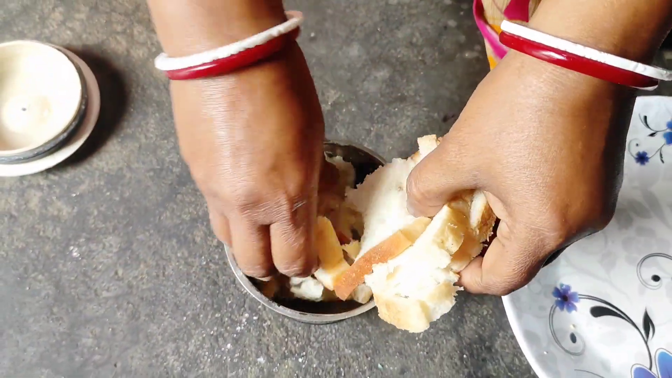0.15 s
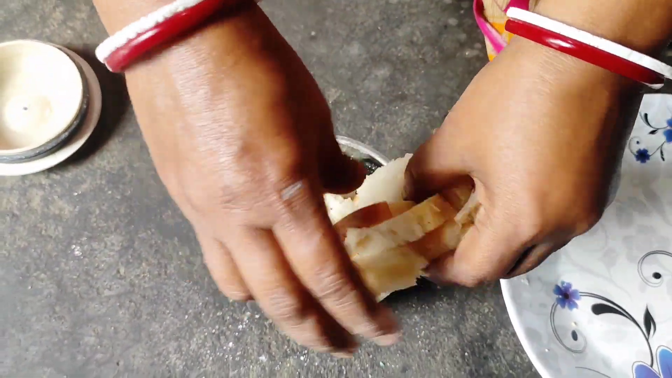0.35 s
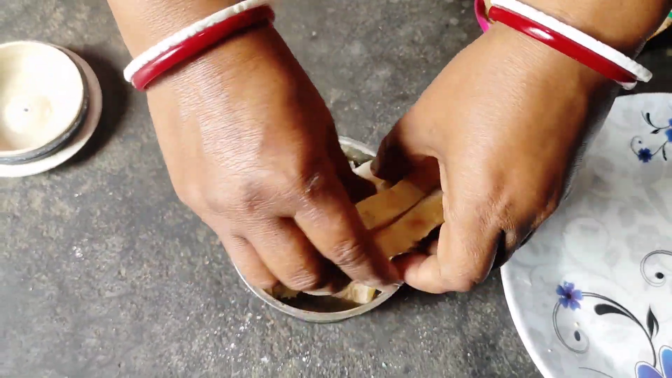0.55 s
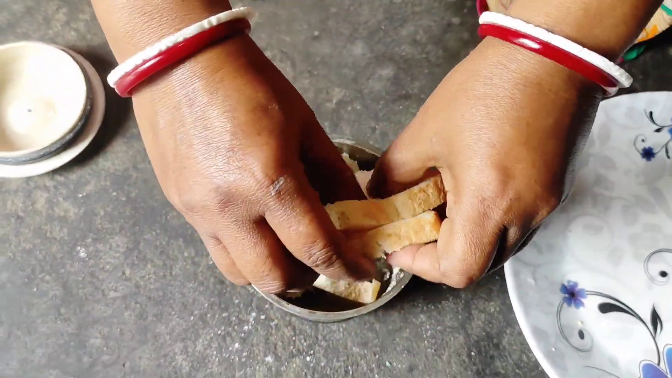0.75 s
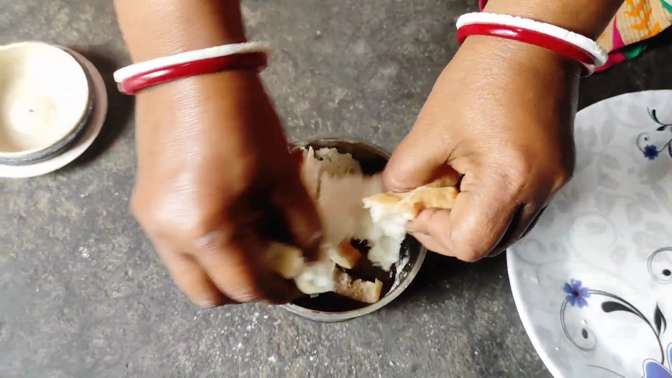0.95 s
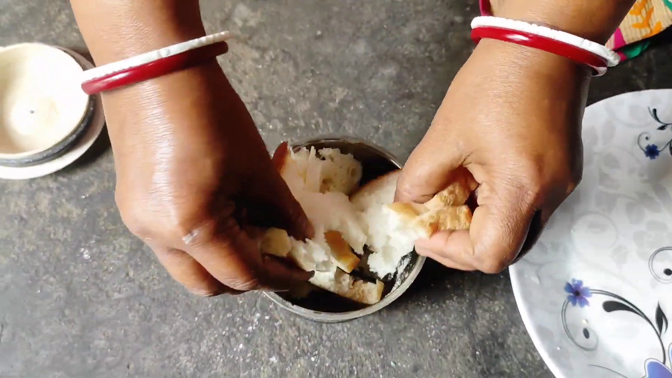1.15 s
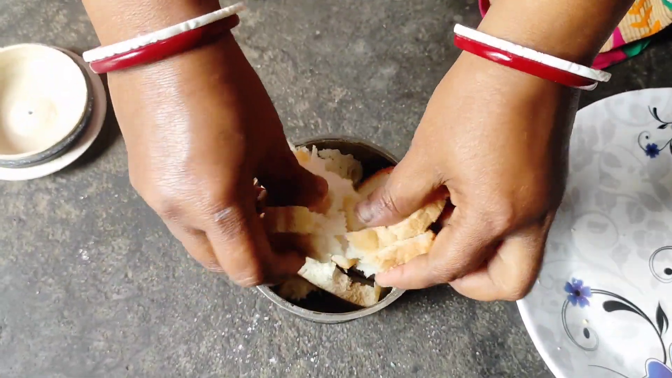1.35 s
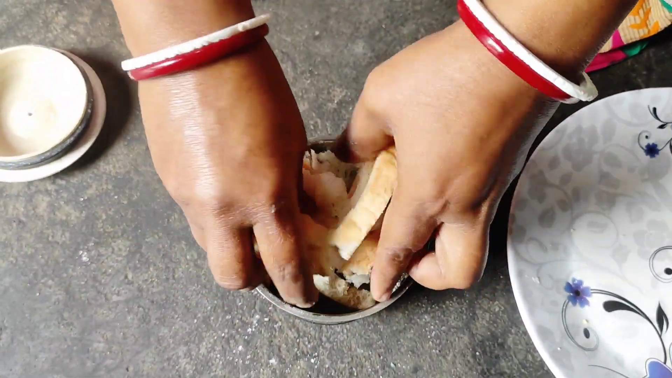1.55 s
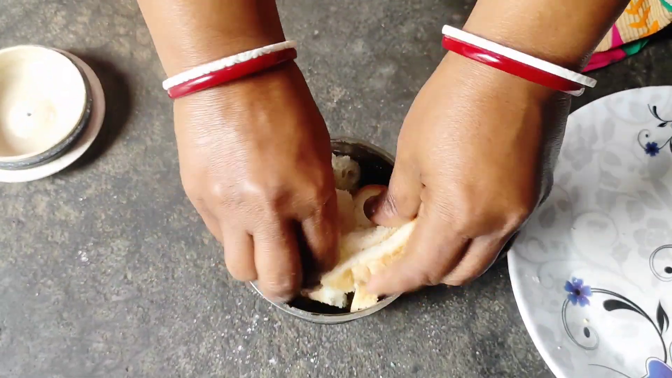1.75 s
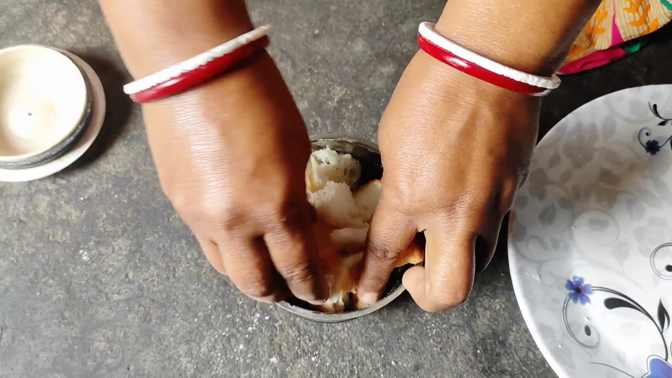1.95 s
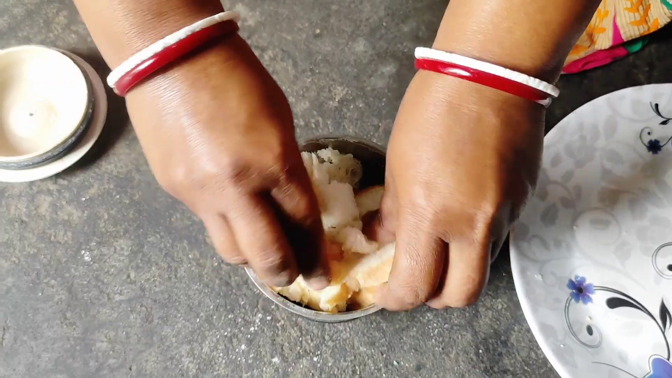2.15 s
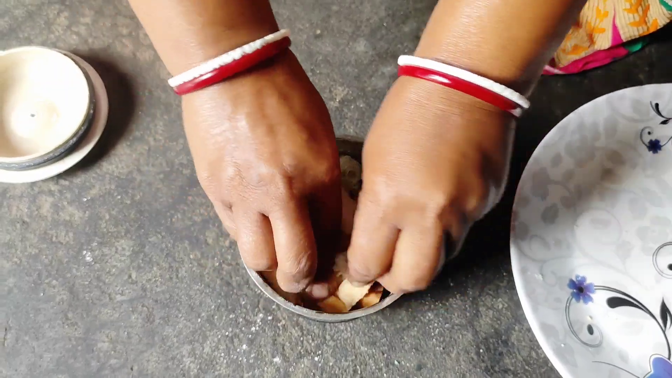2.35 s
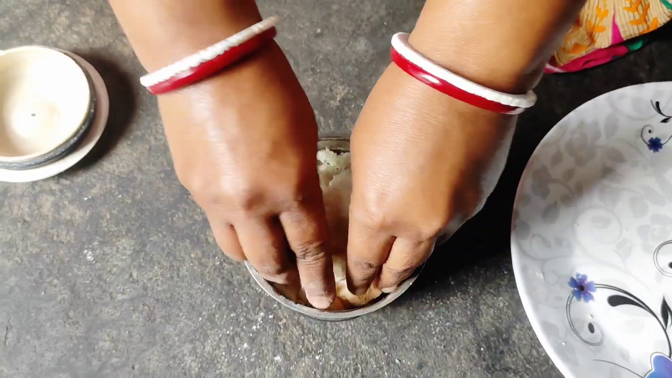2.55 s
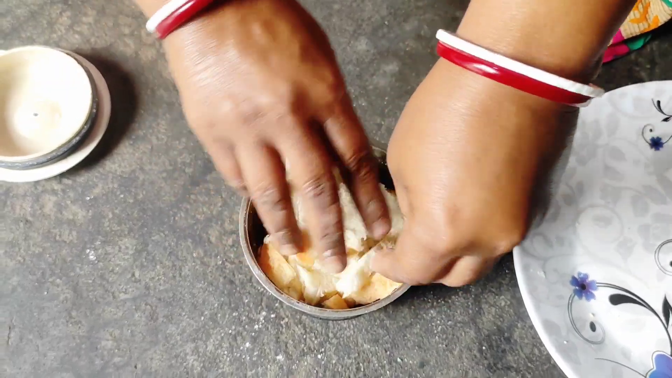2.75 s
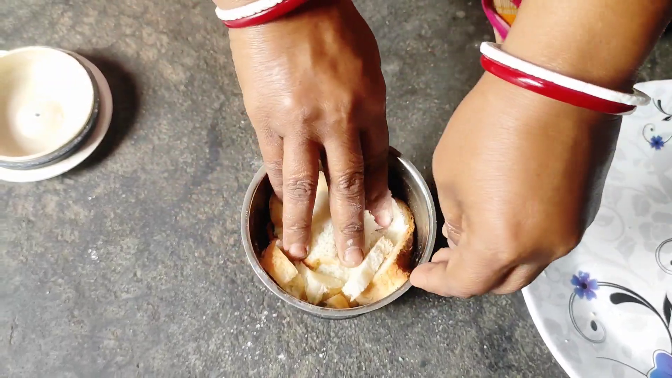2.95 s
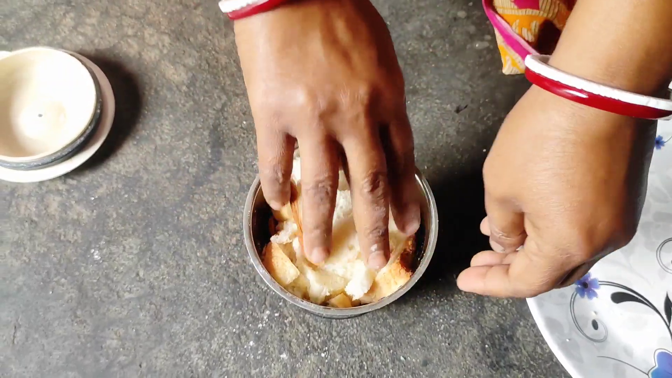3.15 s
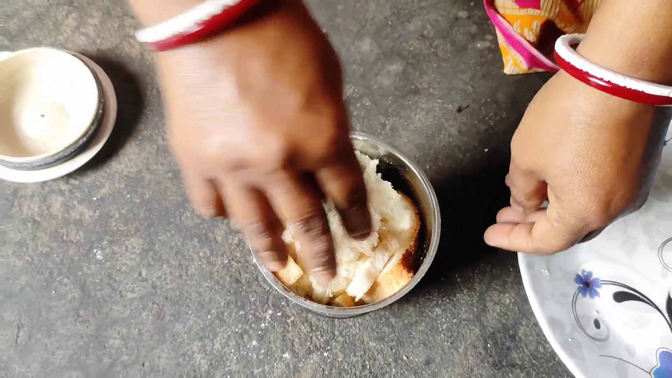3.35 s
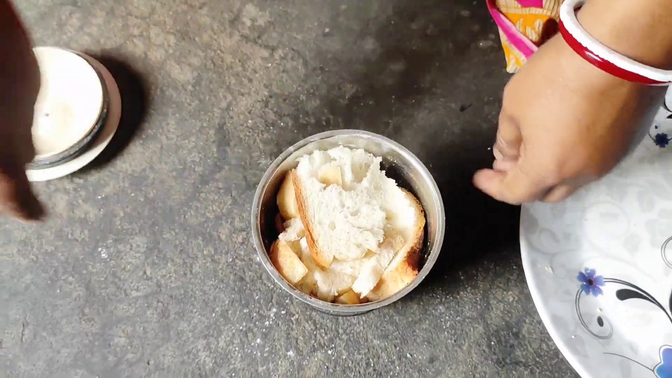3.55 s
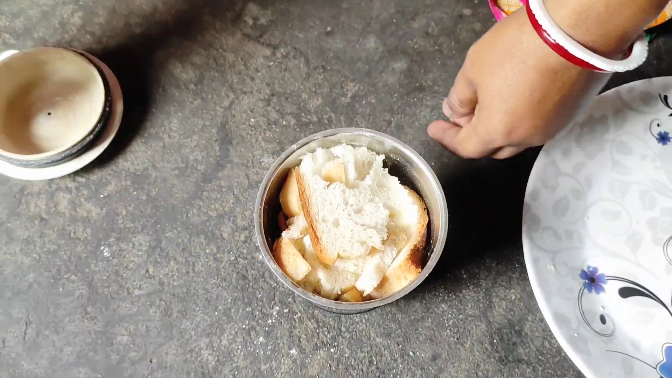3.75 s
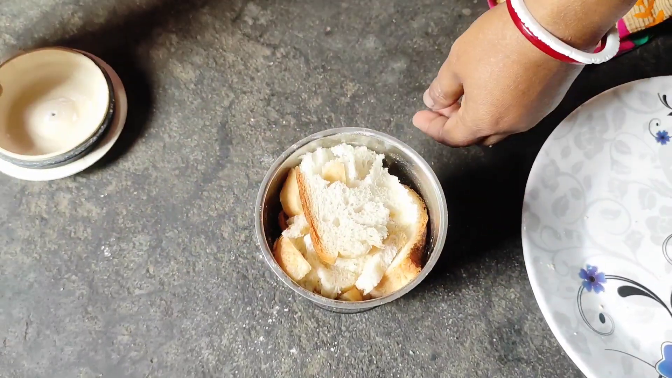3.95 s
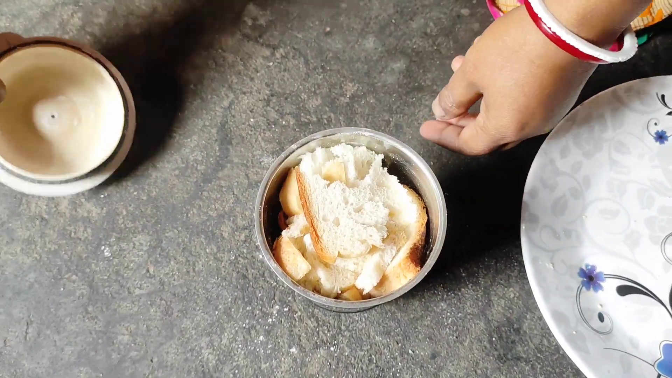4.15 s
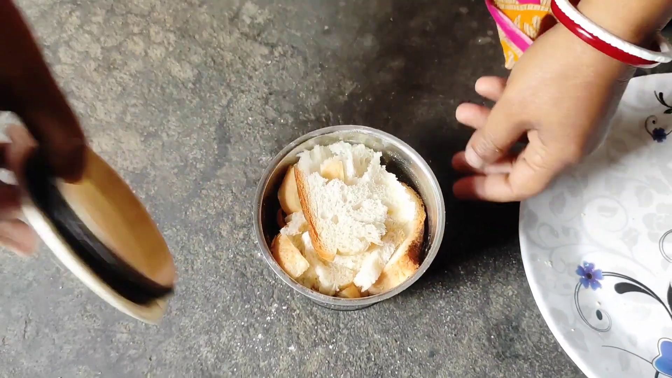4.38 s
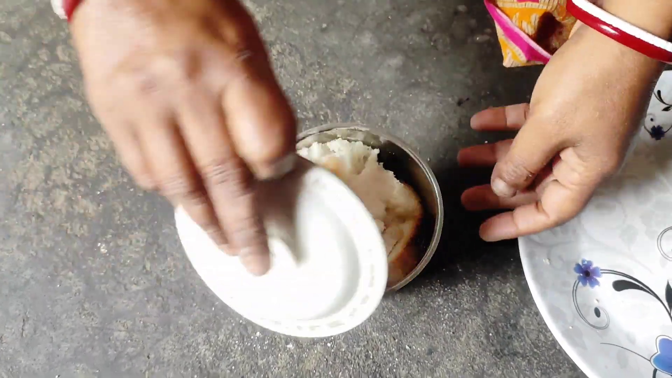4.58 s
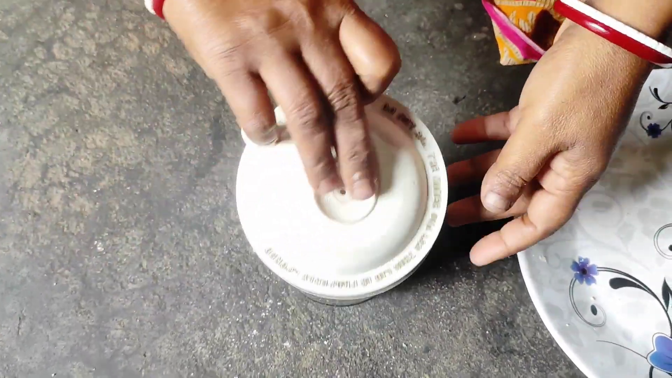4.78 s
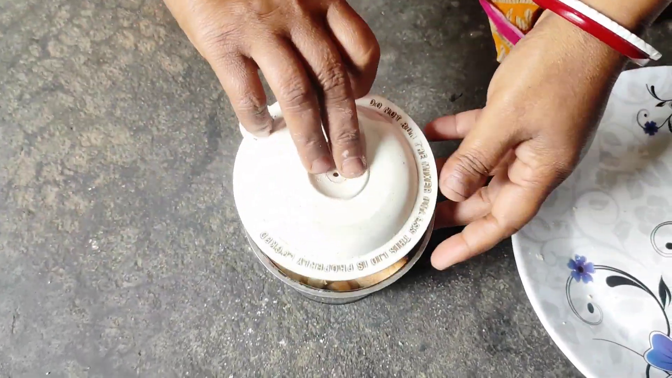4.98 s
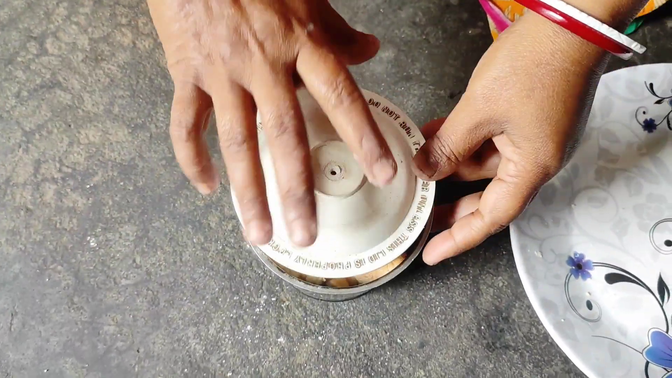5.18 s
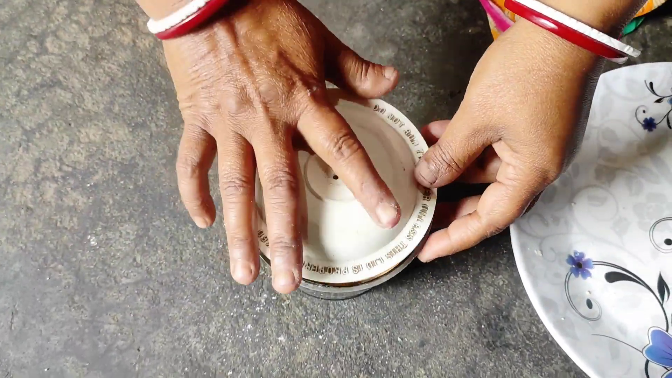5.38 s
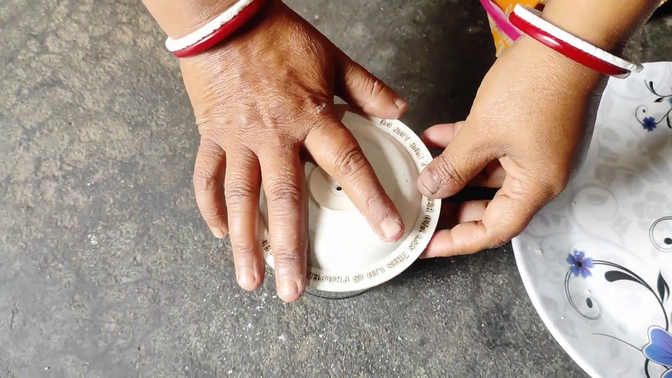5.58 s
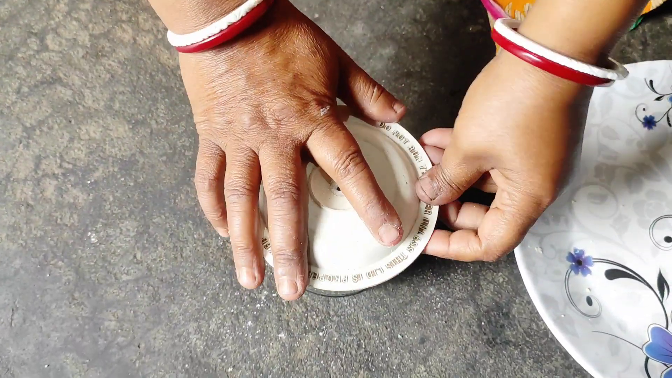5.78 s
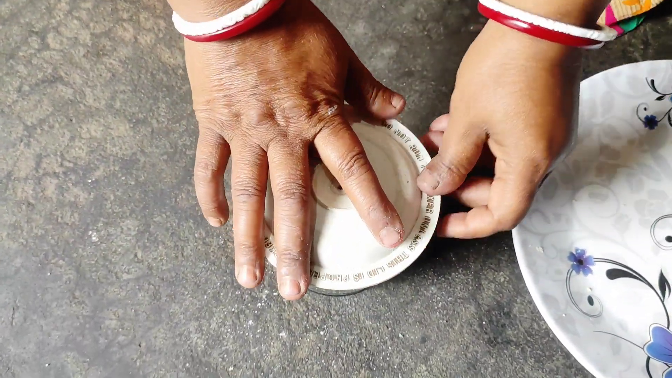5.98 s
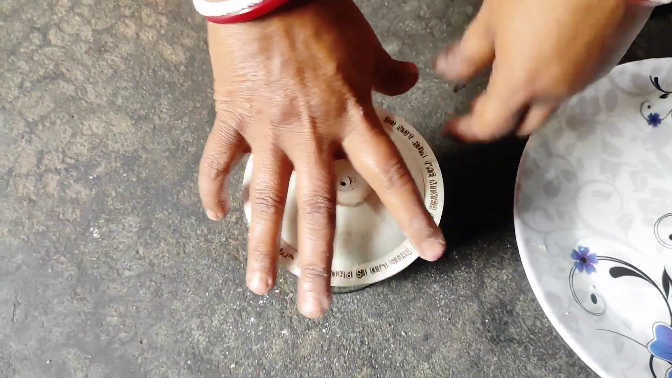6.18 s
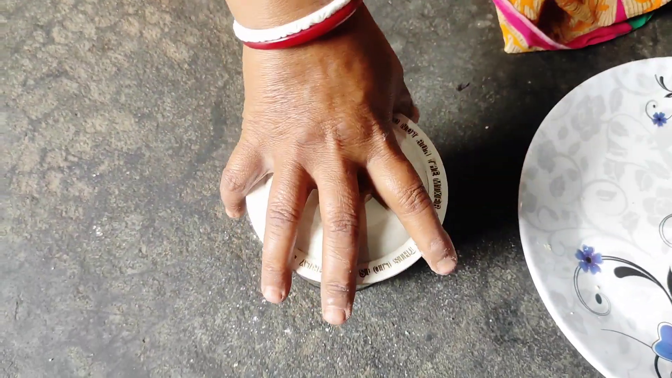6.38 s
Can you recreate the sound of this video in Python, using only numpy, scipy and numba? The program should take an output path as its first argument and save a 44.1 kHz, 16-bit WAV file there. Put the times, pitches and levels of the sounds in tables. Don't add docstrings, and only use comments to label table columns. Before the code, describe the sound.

Bread tears with a soft dry rustle into a steel jar, then a plastic lid knocks loudly on and the jar scrapes briefly over stone.

```python
import sys
import numpy as np
from scipy import signal
from scipy.fft import rfft, irfft, next_fast_len
from scipy.io import wavfile
from scipy.ndimage import uniform_filter1d
from numba import njit

SR = 44100
rng = np.random.default_rng(int(sys.argv[2]) if len(sys.argv) > 2 else 0)


def dump(signal):
    limited = np.clip(np.atleast_2d(signal).T, -1, 1)
    pcm = np.round(limited * 32767).astype(np.int16)
    wavfile.write(sys.argv[1], SR, pcm)


def how_loud(loudness_db):
    steps = np.asarray(loudness_db, float) / 20
    return 10 ** steps


N = 283241
TRAVEL_S, PORT_LAG_S = .0008, .0001


def knocks():
    # (time [s], peak level [dB], body pitch [Hz], crack re body [dB], overtone re body [dB])
    lid_blows = [(4.124, -35, 1370, -8, -17), (4.586, -10.5, 841, -6.5, -1), (4.643, -20.5, 860, -25, -10),
                 (4.784, -28, 820, -22, -9), (4.813, -41, 875, -20, -10), (4.841, -16.5, 738, -17, -15.5),
                 (4.952, -8, 857, -23.5, -9), (4.961, 0, 764, -18, -10), (4.964, -11.5, 1363, -20, -9),
                 (5.588, -28.5, 568, -27, -7), (6.102, -46, 795, -9, -24), (6.132, -39, 860, -0.5, -16),
                 (6.149, -49, 560, 3, -1)]
    # (time [s], peak level [dB], body pitch [Hz])
    foot_blows = [
        (4.584, -32, 270),
        (4.639, -36.5, 229),
        (4.787, -33, 265),
        (4.813, -31.5, 270),
        (4.844, -27, 347),
        (4.96, -25.5, 185),
        (5.516, -37.5, 193),
        (5.586, -22.5, 191.5),
    ]
    # (frequency [Hz], width [Hz], level [dB])
    jar_modes = [(791, 81, -1), (1456, 79, -5), (1920, 82, -9), (2270, 40, -1.5), (2590, 26, -8),
                 (3070, 110, -9.5), (3800, 110, -12), (4540, 37, -8.5), (5700, 40, -14.5), (5900, 100, -16),
                 (6320, 48, -11), (6700, 29, -14), (7000, 58, -20), (7600, 190, -25.5)]
    # (frequency [Hz], width [Hz], level [dB])
    lid_modes = [(590, 46, 2), (830, 16, 0), (1286, 59, -8.5), (1612, 28, -12.5), (2180, 120, -18.5),
                 (2610, 120, -21), (3450, 35, -23.5)]
    seated_s, seated_steel_db = 4.8, -7.5
    held_pan_db, seated_pan_db = -4.5, -1.5

    out = np.zeros((2, N))
    t = np.arange(int(.2 * SR)) / SR
    blows = [(*row, 0.013) for row in lid_blows]
    blows += [(*row, -24.5, -10, 0.022) for row in foot_blows]
    for s, db, hz, crack_db, over_db, t60 in blows:
        noise = scatter(len(t), shared=0.27)
        seated = s > seated_s

        overtones = ring(1.684 * hz, 0.62 * t60, .2) + how_loud(-9.5) * ring(1.7 * hz, 0.26 * t60, .2)
        thud = ring(hz, t60, .2) + how_loud(over_db + 2.5) * overtones
        thud = band(band(thud, 1.65 * hz, 2.62 * hz), 1.65 * hz, 3.3 * hz)

        chatter = noise * (how_loud(5.0) * np.exp(-t / 0.00073) + how_loud(-12.0) * np.exp(-t / 0.0076))
        steel = sum(how_loud(g) * band(chatter, f, 3.23 * w) for f, w, g in jar_modes)
        contact = band(band(chatter, 2500, 3300), 3600, 6200)
        crack = band(contact + how_loud(9 + seated_steel_db * seated) * steel, 2200, 9000)
        crack = signal.sosfilt(signal.butter(3, 7600 / SR * 2, output="sos"), crack)

        plastic = sum(how_loud(g) * band(noise[0] * np.exp(-t / 0.011), f, w) for f, w, g in lid_modes)
        plastic_gain = how_loud(-5.0) * min(hz / 600, 1) * seated
        blow = how_loud(7.5) * thud + how_loud(crack_db + 7) * crack + plastic_gain * plastic
        late = s + .5 / hz
        add(out, late, how_loud(db - 3) * blow, pan_db=seated_pan_db if seated else held_pan_db)
    return out


def booms():
    # (time [s], level [dB], frequency [Hz], width [Hz], decay length [s])
    resonances = [(4.5865, -17, 2400, 1100, 0.0054), (4.5865, -21, 6450, 1050, 0.0032),
                  (4.588, -26, 2270, 200, .045), (4.588, -29, 4540, 200, .03), (4.588, -27, 1450, 250, .02),
                  (4.126, -46, 2400, 900, .04), (2.33, -43, 1250, 200, .012), (2.337, -43, 1550, 250, .01),
                  (2.323, -48, 850, 200, .01), (2.352, -48, 760, 200, .012), (2.29, -51, 1220, 200, .01),
                  (4.587, -17.5, 880, 60, 0.033), (3.4, -42, 1500, 900, 0.00091),
                  (4.8415, -36, 3700, 5400, 0.0019), (4.961, -32, 7200, 16000, 0.00061),
                  (2.475, -46.5, 7100, 5900, 0.0037), (4.76, -43.5, 910, 810, 0.06),
                  (4.97, -27.5, 845, 60, .07), (4.97, -30, 1320, 70, .05), (4.85, -38.5, 650, 200, .05),
                  (4.954, -12, 490, 110, .008), (4.963, -6.5, 548, 156, 0.011), (4.97, -19, 560, 90, 0.1),
                  (4.843, -26.5, 910, 130, 0.0073)]
    out = np.zeros((2, N))
    t = np.arange(int(.2 * SR)) / SR
    for s, db, hz, width_hz, length in resonances:
        rise = np.minimum(t / min(.1 * length, .0004), 1)
        fade = np.cos(t / t[-1] * np.pi / 2)
        puff = scatter(len(t), shared=700 / hz) * np.exp(-t / length) * rise * fade
        boom = band(band(puff, hz, width_hz), hz, min(2.06 * width_hz, SR / 3))
        add(out, s, how_loud(db + 9.5) * boom, pan_db=0)
    return out


def rustle():
    # (peak time [s], peak level [dB], rise [s], fall [s], hiss centre [Hz])
    tears = [(.01, -66, 0.025, 0.15, 4020), (.16, -70.5, 0.019, .4, 4750), (.28, -69, .2, 0.098, 4400),
             (0.421, -59.5, 0.062, 0.23, 3900), (.97, -63.5, 0.26, 0.22, 4060),
             (.985, -59.5, .015, .04, 4600), (1.06, -64.5, 0.25, 0.43, 4500),
             (1.41, -60.5, 0.024, 0.31, 3740), (1.5, -63.5, .15, 0.13, 3650), (1.65, -62, .05, 0.33, 3300),
             (1.93, -58, 0.2, 0.17, 3340), (2.01, -59.5, 0.13, 0.26, 3330), (2.27, -63, 0.046, 0.34, 4800),
             (2.35, -59.5, 0.061, 0.14, 4420), (2.42, -58.5, 0.055, 0.099, 4460),
             (2.49, -63, 0.078, 0.12, 5200), (2.7, -65.5, 0.49, 0.36, 4430),
             (3.26, -71.5, 0.23, 0.25, 4140), (3.405, -59, 0.0099, .2, 3860),
             (3.49, -56.5, 0.12, 0.19, 5600)]
    # (peak time [s], peak level [dB], rise [s], fall [s], hiss
    # centre [Hz])
    handling = [(4.0, -57.5, 0.014, 0.069, 3900), (4.08, -57.5, .06, .04, 4100),
                (4.13, -64, 0.068, 0.22, 3470), (4.3, -62, 0.11, 0.44, 4260),
                (4.42, -63.5, 0.047, .5, 3340), (5.427, -60.5, 0.24, 0.3, 3840),
                (5.588, -57.5, .02, 0.05, 4450), (5.69, -52.5, 0.022, 0.59, 5130),
                (5.82, -47.5, 0.29, 0.038, 4710), (5.98, -68, .4, 0.34, 3350),
                (6.075, -57.5, 0.068, 0.29, 4230), (6.42, -58.5, 0.09, .1, 4600)]
    # (peak time [s], peak level [dB], rise [s], fall [s])
    heavy_pushes = [(.99, -61, .05, 0.093), (1.65, -54.5, 0.045, 0.19), (1.85, -59, .1, .15),
                    (2.26, -49.5, 0.018, 0.24), (2.325, -47, .015, 0.14), (2.355, -49, 0.072, 0.032),
                    (3.26, -60.5, 0.18, 0.22), (4.13, -47, 0.034, 0.17), (4.32, -53.5, .15, 0.3),
                    (5.52, -54.5, 0.45, .15), (5.586, -62, .02, 0.12), (5.685, -44.5, 0.031, 0.46),
                    (5.82, -44, 0.26, 0.076)]
    # (frequency [Hz], spectral density [dB per Hz])
    crumb_spectrum = [(1060, -48.5), (1800, 3), (2610, 2.5), (5960, -3), (9630, -14), (13200, -29),
                      (14100, -24), (15000, -62)]
    # (frequency [Hz], width [Hz], level [dB])
    hollow_modes = [(865, 230, 1.5), (1234, 140, 2), (1490, 120, -5.5)]

    rubs = swells(tears + handling)
    rub = together(rubs)
    hz = np.array(tears + handling)[:, -1] @ rubs ** 2 / rub ** 2
    light_push = how_loud(-3.5) * rub
    push = np.hypot(light_push, together(swells(heavy_pushes)))
    out = []
    for side in (1, -1):
        fine = shaped(grains(9700, 3.4), crumb_spectrum)
        fine = how_loud(-7.0) * fine + how_loud(0.5) * sweep(fine, hz, 1.0)
        fine = fine * how_loud(1.7 * walk(25))
        slips = grains(2500, 2.4)
        dull = unit(sum(how_loud(g) * band(slips, f, w) for f, w, g in hollow_modes))
        out.append(how_loud(side * 1.3) * (how_loud(6.5) * rub * fine + how_loud(-3) * push * dull))
    return np.array(out)


def drag():
    # (time [s], rumble level [dB], grit re rumble [dB])
    slide = [
        (5.6, -42, -27),
        (5.61, -56, -6),
        (5.634, -51, -11),
        (5.672, -45.5, -8),
        (5.69, -36.5, 0.5),
        (5.782, -34.5, -7.5),
        (5.822, -32.5, -12),
        (5.85, -48, -14),
        (5.95, -56, -10),
    ]
    # (time [s], level re rumble [dB])
    jolt_table = [(5.6825, 15), (5.6954, 9), (5.7086, 14), (5.7224, 11), (5.7367, 15), (5.7500, 17.5),
                  (5.7640, 17.5), (5.7780, 15), (5.7910, 17), (5.8020, 17), (5.8115, 16), (5.8160, 12.5),
                  (5.8216, 16)]
    # (frequency [Hz], width [Hz], level [dB])
    body_modes = [(190.6, 102, 5), (415, 170, -11), (831, 100, 1.5), (1240, 67, -8.5)]
    # (frequency [Hz], spectral density [dB per Hz])
    grit_spectrum = [(710, 5.5), (1200, 2), (1470, 1), (2190, -17), (6440, 2), (10500, -17), (13600, -14),
                     (15000, -54)]
    contact_s, flare_s = .0008, .005

    db, grit_db = curve([slide], -120)
    jolts = np.zeros(N)
    s, jolt_db = np.transpose(jolt_table)
    jolts[((s - .002) * SR).astype(int)] = how_loud(jolt_db)

    contact = np.hanning(int(contact_s * SR))
    pulses = np.convolve(jolts, contact / contact.sum(), "same")
    slips = grains(600, 3.0, top_db=9) - how_loud(-2.5) * pulses
    slips = signal.lfilter(*signal.butter(1, 1800, fs=SR), slips)
    body = unit(sum(how_loud(g) * band(slips, hz, w) for hz, w, g in body_modes))

    flare = signal.lfilter([1], [1, -np.exp(-1 / (flare_s * SR))], jolts)
    grit = shaped(grains(4000, 2.7) * (1 + how_loud(-20) * flare), grit_spectrum)
    out = np.zeros((2, N))
    add(out, .001, how_loud(db - 4) * (body + how_loud(grit_db) * grit), -1)
    return out


def ticks():
    # (time [s], peak level [dB], pitch [Hz], spark re ring [dB], spark centre [Hz])
    taps = [(0.0293, -50.5, 4030, 0, 4600), (0.1596, -31, 4560, -15, 4900), (0.2573, -49, 4000, 3, 4600),
            (0.41, -49, 1970, 1, 4600), (0.9794, -46, 3730, 0, 4600), (1.3985, -54, 1980, -9, 4600),
            (1.638, -44, 2450, -20, 4600), (2.477, -47, 2600, 8, 6500), (3.401, -44, 4100, -4, 4600),
            (3.9935, -43, 2600, 3, 6100), (4.0122, -34.5, 2660, -1, 4700), (4.0135, -47, 6300, -4, 8600),
            (4.0713, -41, 2600, 0, 6100), (4.091, -42, 2700, -12, 4600), (4.1247, -29, 2330, -6, 5000),
            (4.138, -40, 3200, -12, 4600), (4.158, -40, 2380, -12, 4600), (4.414, -45, 4160, 0, 4600),
            (5.59, -34.5, 4230, 3.5, 4600), (6.019, -48, 5600, -3, 5600), (6.0727, -38, 3470, 0, 5500)]
    out = np.zeros((2, N))
    t = np.arange(int(.05 * SR)) / SR
    t60 = 0.012
    for s, db, hz, spark_db, spark_hz in taps:
        spark = band(band(scatter(len(t), shared=0.14), spark_hz, 2400), spark_hz, 3800)
        spark = spark * np.exp(-t / 0.003) * np.minimum(t / .0008, 1) * how_loud(3)
        pair = band(ring(hz, t60, .05) + how_loud(-12.0) * ring(1.115 * hz, t60, .05), hz, hz)
        add(out, s - TRAVEL_S, how_loud(db + 2.5) * (pair + how_loud(spark_db) * spark), pan_db=6)
    return out


def birds():
    # (start [s], length [s], first pitch [Hz],
    # last pitch [Hz], level [dB])
    whistles = [(0.431, 0.26, 2270, 2250, -65), (1.152, 0.076, 2120, 2310, -61),
                (1.64, 0.04, 5220, 5250, -67), (1.822, 0.064, 2167, 2440, -49),
                (1.847, 0.076, 6440, 6330, -62), (1.884, 0.059, 3560, 3450, -57),
                (1.893, 0.079, 2110, 1860, -56), (1.914, 0.056, 2370, 2526, -51),
                (1.92, 0.095, 4270, 4320, -52), (1.919, 0.023, 8700, 8000, -57.5),
                (1.957, 0.086, 3130, 3070, -42), (1.957, .084, 3060, 3000, -48),
                (2.051, .022, 3085, 3060, -41.5), (3.043, 0.052, 3650, 3980, -65),
                (3.399, 0.071, 3720, 3820, -62), (4.017, .1, 1795, 1860, -59.5),
                (5.977, .1, 6500, 6450, -64), (5.995, .13, 3130, 3243, -47)]
    # (start [s], length [s], first pitch [Hz], level [dB])
    piping = [
        (1.514, 0.1, 2560, -56),
        (2.437, 0.097, 2632, -57),
        (2.707, .16, 2627, -63),
        (3.145, 0.11, 2610, -59.5),
        (3.302, .08, 2630, -67.5),
        (3.52, 0.19, 2565, -63.5),
    ]
    # (start [s], length [s], pitch [Hz], level [dB], hoarseness [Hz])
    chirps = [
        (1.236, 0.086, 2396, -60, 74),
        (1.647, 0.045, 3400, -58, 132),
        (2.491, 0.051, 6385, -61, 140),
        (3.07, 0.079, 4060, -62.5, 112),
        (3.995, 0.11, 2630, -53, 250),
        (3.1, 0.11, 2760, -64, 67),
        (6.062, 0.055, 4250, -49, 197),
        (6.078, 0.05, 4680, -43.5, 150),
        (6.13, 0.057, 4300, -51, 300),
        (6.062, 0.066, 8050, -55.5, 250),
    ]
    out = np.zeros(N)
    waver = .45 * walk(150) + 1.1 * walk(600)
    flutter = how_loud(1.8 * walk(70))
    notes = [(*row, 42.4) for row in whistles]
    notes += [(s, length, hz, hz - 47.5, db, 45) for s, length, hz, db in piping]
    notes += [(s, length, hz, hz, db, hoarse_hz) for s, length, hz, db, hoarse_hz in chirps]
    for s, length, first_hz, last_hz, db, hoarse_hz in notes:
        i, n = int(s * SR), int(length * SR)
        hz = np.linspace(first_hz, last_hz, n) + 1.2 * hoarse_hz * waver[i:i + n]
        tone = np.sin(np.cumsum(2 * np.pi * hz / SR))
        swell = np.sin(np.pi * np.arange(n) / n) ** 0.2
        out[i:i + n] += how_loud(db) * tone * swell * flutter[i:i + n]
    return out


def room(x, slower=1.0, gap_s=.004):
    # (frequency [Hz], decay time t60 [s], level [dB])
    walls = [(126, .3, -9.5), (248.5, 0.38, -5.5), (400, 0.45, -13.5), (545, .6, -8.5), (880, .33, -14),
             (1300, .35, -12), (1800, .35, -11.5), (2290, 0.45, -8.5), (3200, 0.38, -8), (4600, 0.37, -3),
             (6300, .33, -4.5), (8000, .17, -29), (14000, .1, -42)]
    t = np.arange(int(.9 * SR)) / SR
    thick = .3 * np.clip((t - gap_s) / .04, 0, 1) ** 2 + .06
    arrivals = (rng.random((2, len(t))) < thick) * (t > gap_s) / np.sqrt(2 * thick)
    arrivals = arrivals * np.minimum(0.92 + t / 0.033, 1)
    tail = 0
    for hz, t60, db in walls:
        mid, side = band(arrivals * rng.standard_normal(arrivals.shape), hz, 0.44 * hz)
        pair = mid + min(hz / 950, 1) * side * np.array([[1], [-1]])
        tail = tail + how_loud(db - 27) * pair * 1000. ** (-t / (t60 * slower))
    return signal.fftconvolve(x[None], tail, axes=1)[:, :N]


def rumble():
    # (peak time [s], peak level [dB], rise [s], fall [s])
    traffic = [
        (.4, -56, 1.2, 0.62),
        (1.93, -59.5, 1.6, .3),
        (2.31, -52.5, 0.26, .4),
        (2.65, -56.5, .5, .12),
        (3.4, -53.5, 0.95, 0.32),
        (4.35, -54.5, 0.78, 0.11),
        (4.9, -54, 0.62, .3),
        (5.54, -55.5, 1.7, .3),
        (5.85, -45, 0.82, .1),
        (6.08, -50.5, 0.43, 0.53),
    ]
    gain = np.hypot(how_loud(-71), together(swells(traffic)))
    low = band(band(rng.standard_normal((3, N)), 74, 70), 74, 70)
    return how_loud(-4.5) * gain * unit(low[:2] + 0.11 * low[2])


def house():
    # (frequency [Hz], spectral density [dB per Hz])
    hum_spectrum = [(14, -7), (66, 0.5), (256, -8), (1300, -19), (2620, -20), (8500, -34.5), (13800, -35.5),
                    (15000, -68.5)]
    mid, side = (shaped(rng.standard_normal(N), hum_spectrum) for _ in range(2))
    out, swell = 0, walk(1.6)
    for hz in 25 * 2 ** np.arange(0, 9.3, .5):
        difference = min(0.71 + hz / 4000, 1) * band(side, hz, hz / 3)
        pair = band(mid, hz, hz / 3) + difference * np.array([[1], [-1]])
        pair = pair * how_loud([[.7], [-.7]])
        out = out + how_loud(1.26 * swell + 0.8 * walk(4.8)) * pair
    return how_loud(-55) * unit(out)


def unit(x):
    return x / np.sqrt(np.mean(x ** 2))


def band(x, hz, width_hz):
    return signal.lfilter(*signal.iirpeak(hz, max(hz / width_hz, .3), SR), x)


@njit
def sweep(x, hz, damping):
    y, b, l = np.empty(len(x)), 0., 0.
    for i in range(len(x)):
        g = np.tan(np.pi * hz[i] / SR)
        v = (b + g * (x[i] - l)) / (1 + g * (g + damping))
        b, l, y[i] = 2 * v - b, l + 2 * g * v, damping * v
    return y


def ring(hz, t60, length=.5):
    t = np.arange(int(length * SR)) / SR
    return np.sin(2 * np.pi * hz * t) * 1000. ** (-t / max(t60, .001))


def shaped(x, spectrum):
    hz, db = np.transpose(spectrum)
    size = next_fast_len(N)
    f = np.arange(size // 2 + 1) * SR / size + 1
    gain = how_loud(np.interp(np.log(f), np.log(hz), db))
    return unit(irfft(rfft(x, size) * gain, size)[:N])


def curve(tables, silent_db):
    s, *columns = np.transpose(np.vstack(tables))
    t = np.arange(N) / SR
    out = [np.interp(t, s, c) for c in columns]
    inside = sum((t >= rows[0][0]) & (t <= rows[-1][0] + .01) for rows in tables)
    return [np.where(inside, out[0], silent_db)] + out[1:]


def swells(rows):
    t = np.arange(N) / SR
    return np.array([how_loud(db - 20 * np.maximum((s - t) / rise, (t - s) / fall))
                     for s, db, rise, fall, *_ in rows])


def together(gains):
    return np.sqrt(np.sum(gains ** 2, axis=0))


def walk(rate):
    k = int(SR / rate)
    held = np.repeat(rng.standard_normal(N // k + 1), k)
    return 1.2 * uniform_filter1d(uniform_filter1d(held, k), k)[:N]


def grains(per_s, spread_db, top_db=12):
    chance = rng.random((3, N))
    size = how_loud(np.minimum(-spread_db * np.log(1 - chance[2]), top_db))
    return (chance[0] < per_s / SR) * np.sign(chance[1] - .5) * size


def scatter(count, shared):
    noise, shared = rng.standard_normal((3, count)), np.clip(shared, 0, 1)
    return np.sqrt(shared) * noise[2] + np.sqrt(1 - shared) * noise[:2]


def add(out, s, sound, pan_db):
    for ch, side in enumerate((1, -1)):
        i = int((s + TRAVEL_S + side * PORT_LAG_S / 2) * SR)
        n = min(sound.shape[-1], N - i)
        out[ch, i:i + n] += how_loud(side * pan_db / 2) * np.atleast_2d(sound)[-ch, :n]


def scene():
    lid = knocks() + booms()
    small, slide, calls = ticks(), drag(), birds()
    echo = room(lid[1] + how_loud(-13.0) * small[1] + how_loud(-4.0) * slide[1])
    far = calls * how_loud([[1.5], [-1.5]]) + how_loud(-0.5) * room(calls, slower=1.5)
    return lid + small + slide + echo + rustle() + far + house() + rumble()


def top_cut(x):
    return signal.sosfilt(signal.butter(12, 16430, fs=SR, output="sos"), x)


def record(dry):
    soft = signal.sosfilt(signal.butter(4, 14800, fs=SR, output="sos"), dry)
    mix = np.clip(soft, -1, 1)
    return top_cut(mix)


dry = scene()
out = record(dry)
dump(out)
```